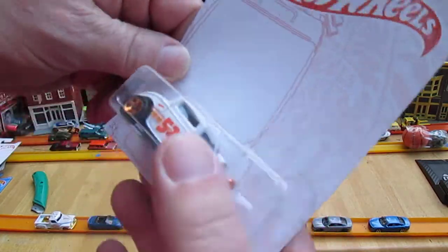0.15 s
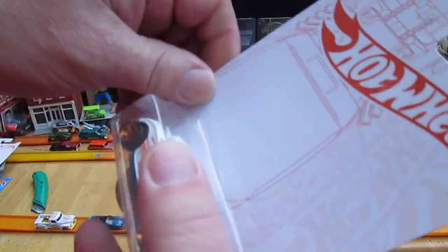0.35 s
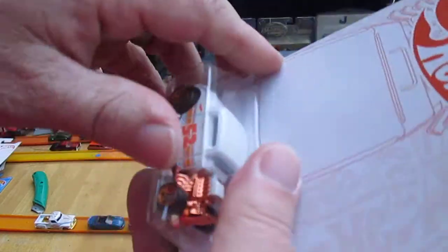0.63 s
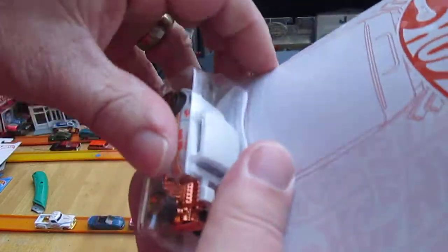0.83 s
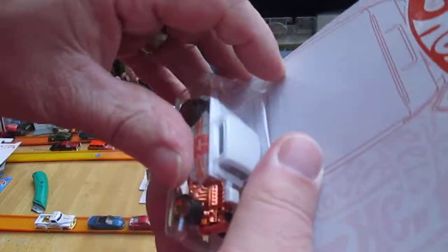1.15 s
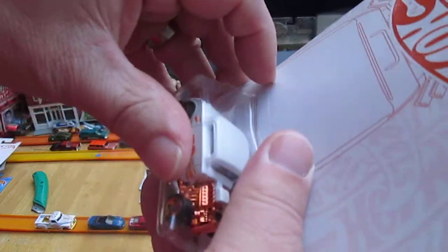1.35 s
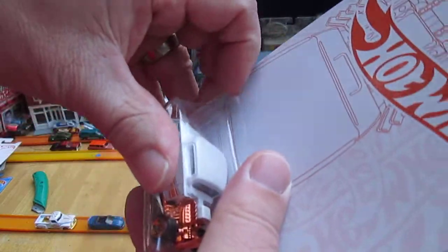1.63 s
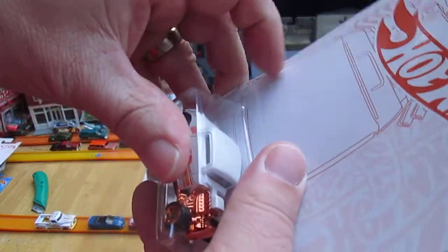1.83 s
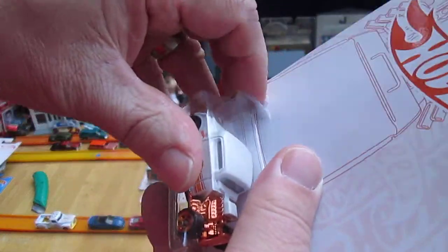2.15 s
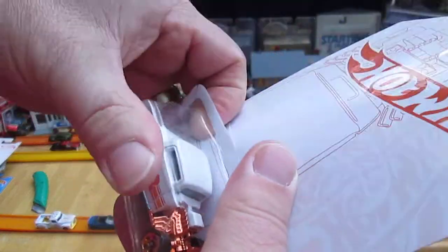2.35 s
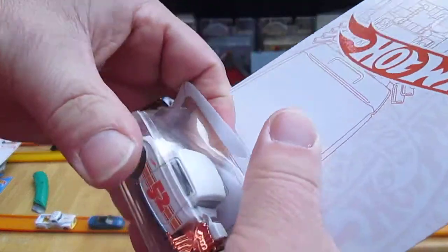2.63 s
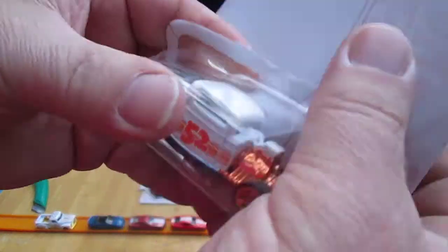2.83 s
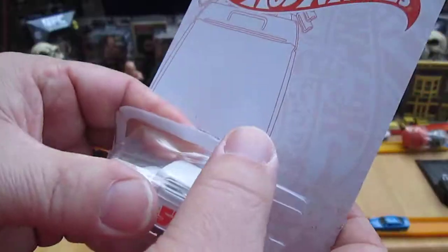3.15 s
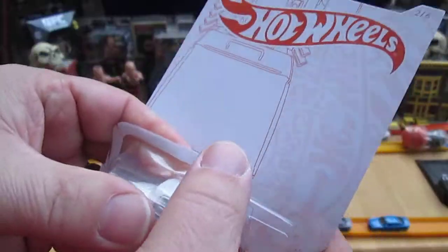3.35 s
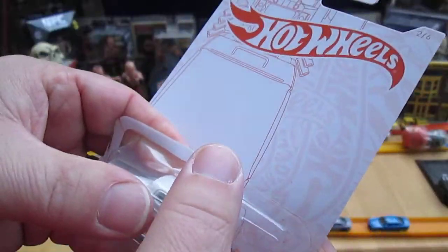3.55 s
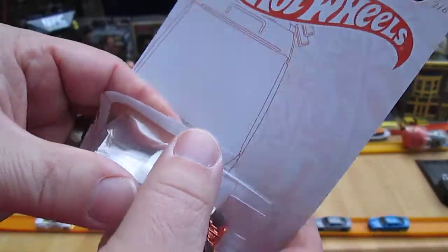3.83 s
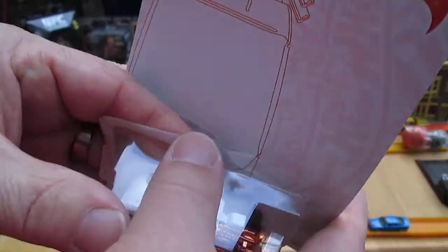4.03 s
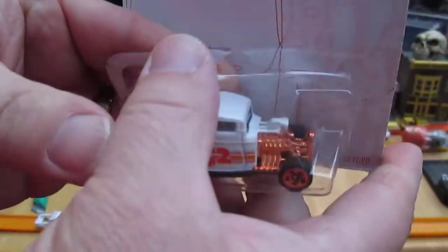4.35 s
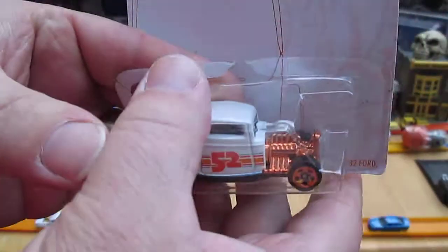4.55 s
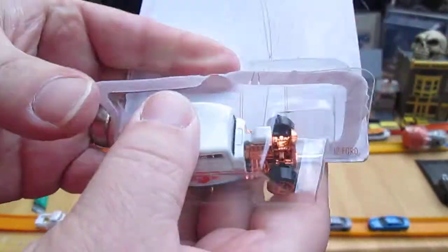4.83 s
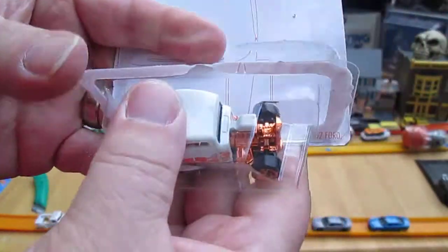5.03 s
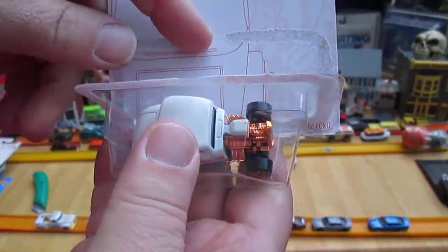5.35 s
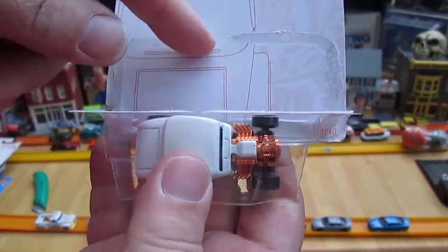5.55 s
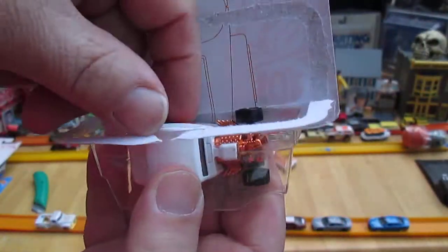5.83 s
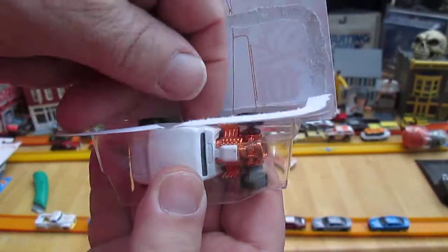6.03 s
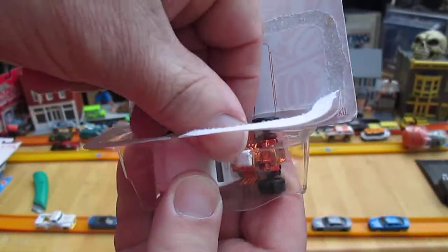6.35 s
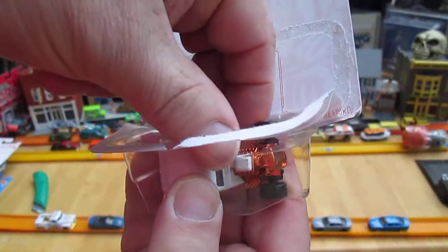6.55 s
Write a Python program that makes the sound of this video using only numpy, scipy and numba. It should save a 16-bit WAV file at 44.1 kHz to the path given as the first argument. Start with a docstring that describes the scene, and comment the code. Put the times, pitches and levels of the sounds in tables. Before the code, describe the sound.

Very close to the microphone in a small quiet room, fingers rub a stiff plastic pack on card. Light crackles lead to a violent snap before two seconds, then more sharp pops, scrapes and glue ticks. A far engine hums low and rises in pitch midway, while a faint bird repeats its phrase. Weaker crackles finish.

```python
"""Hands rub a stiff plastic blister pack, close to a camera in a small quiet room with an engine humming far off.
From half a second on the shell buckles: ringing panels and a noise crack, hardest near 1.7 s, where a limiter
pulls the gain down for seconds. Fingers and card scrape as random slips, and glue fibres tick as noise bursts.
High, brief modes ring with the buckles at 2.3 and 3.9 s; from 3 s the engine turns faster and a far bird repeats
a phrase of gliding sines. Weaker buckles, rubbing and two brief rings at 6.6 s close the scene."""
import sys
import numpy as np
from scipy import signal
from scipy.fft import rfft, irfft, next_fast_len
from scipy.io import wavfile
from scipy.ndimage import uniform_filter1d
from numba import njit

SR = 44100
rng = np.random.default_rng(int(sys.argv[2]) if len(sys.argv) > 2 else 0)


def output_pcm(signal):
    """Save a mono or channel-first signal as 16-bit PCM at the path in sys.argv[1].

    Samples are clipped to [-1, 1] before scaling.
    """
    pcm = np.clip(np.atleast_2d(signal).T, -1, 1) * 32767
    wavfile.write(sys.argv[1], SR, np.round(pcm).astype(np.int16))


N = 295249
TIME = np.arange(N) / SR


def undb(db):
    """Decibels to gain."""
    return 10 ** (np.asarray(db) / 20)


def unit(x):
    """Scale to rms 1."""
    return x / np.sqrt(np.mean(x ** 2) + 1e-18)


def curves(table):
    """The columns of a table, joined by straight lines in time."""
    s, *columns = np.transpose(table)
    return [np.interp(TIME, s, c) for c in columns]


def add(out, s, x):
    """Mix x into out from s seconds on."""
    i = max(int(s * SR), 0)
    out[i:i + len(x)] += x[:max(N - i, 0)]


def fade(t, t60):
    """Exponential decay, 60 dB down at t60."""
    return np.exp(-np.log(1000) * t / t60)


def ring(t, hz, t60):
    """One struck mode: a decaying sine."""
    return np.sin(2 * np.pi * hz * t) * fade(t, t60)


def rings(table):
    """Blows that each ring one short mode."""
    out = np.zeros(N)
    for s, db, hz, t60 in table:
        add(out, s, undb(db) * ring(TIME[:8192], hz, t60))
    return out


def colour(x, points):
    """Filter by a spectrum of (Hz, dB) points, joined on a log frequency axis."""
    hz, db = np.transpose(points)
    size = next_fast_len(len(x))
    f = np.maximum(np.fft.rfftfreq(size, 1 / SR), 1)
    gain = undb(np.interp(np.log(f), np.log(hz), db))
    return irfft(rfft(x, size) * gain, size)[:len(x)]


def resonate(x, hz, q):
    """A resonance with gain 1 at its centre."""
    b, a = signal.iirpeak(min(hz, SR / 4), max(q, .5), fs=SR)
    return signal.lfilter(b, a, x)


def walk(rate):
    """Random levels held 1 / rate seconds and smoothed twice; rms 1."""
    k = int(SR / rate)
    steps = np.repeat(rng.standard_normal(N // k + 1), k)
    return unit(uniform_filter1d(uniform_filter1d(steps, k), k)[:N])


def slips(size, rate, spread_db):
    """Stick-slip: tiny releases at random moments, rate per second, a few much larger than the rest."""
    happens = rng.random(size) < rate / SR
    strength = undb(spread_db * np.minimum(rng.exponential(size=size), 4))
    return happens * strength * rng.choice([-1, 1], size)


def echoes(x, t60, top_hz):
    """Diffuse reflections: band-limited decaying noise, scaled to unit energy."""
    t = TIME[:SR]
    band = signal.butter(2, [120, min(top_hz, SR / 3)], "band", fs=SR, output="sos")
    tail = signal.sosfilt(band, rng.standard_normal(SR))
    tail *= fade(t, t60) * np.minimum(t / 0.0075, 1)  # reflections build up over 7.5 ms
    return signal.fftconvolve(x, tail / np.linalg.norm(tail))[:N]


# the shell buckles: t/s, level/dB, wide panel f/Hz, narrow panel f/Hz, panel t60/s,
# narrow panel level/dB, crack level/dB
SNAPS = [(0.5509, -22.5, 770, 1590, 0.032, -0.5, -3.5), (1.4059, -7, 860, 1360, 0.0069, -10, -18),
         (1.6612, -4, 1020, 1510, 0.0084, -8.5, -4), (1.6655, -2.5, 910, 1480, 0.018, 5.5, -10),
         (1.6705, 12, 1060, 1535, 0.011, 4.5, 3), (1.6724, 13.5, 796, 2260, 0.014, -10.5, 0),
         (1.7151, -19, 930, 1560, 0.0048, 2, 5), (1.815, -11, 844, 1720, .008, -8, -3.5),
         (2.3079, 10, 910, 1770, 0.0095, -3, -10.5), (2.441, -11.5, 770, 1370, .0092, -3, -12),
         (2.4847, 3, 1000, 1370, 0.0038, 2, -2), (2.4869, 7, 804, 1780, 0.0048, 4.5, -8.5),
         (2.4876, 5, 825, 1360, 0.019, 2, -24), (2.495, -2.5, 900, 1240, 0.022, -9, -35),
         (2.6235, -14, 974, 1350, 0.02, -23, -28), (3.9323, 8, 765, 1593, 0.0051, 10.5, -11),
         (4.392, -23.5, 690, 1510, .008, -20, -25), (4.6211, -9, 810, 1440, 0.017, -9, -21),
         (4.788, -0.5, 558.5, 1570, .0085, 2, -12), (4.7898, -3.5, 420, 1027, 0.029, 4, -13),
         (4.796, -6, 910, 2130, .027, -19, 0), (4.8, 3.5, 630, 1490, .0038, -1, -7),
         (4.8058, -6.5, 601, 1340, .0049, 0, -28), (5.3313, -24.5, 925, 1610, 0.015, 13, -2),
         (5.4454, -27, 800, 1510, 0.0093, 0, 4), (5.602, -15, 760, 1240, 0.011, -11, -28),
         (5.7234, -17.5, 680, 1600, 0.018, -0.5, -8), (5.948, -16, 670, 1464, 0.033, 6.5, -5.5),
         (6.1132, -14.5, 1150, 1290, 0.0036, 8, -4.5), (6.238, -21.5, 710, 1570, 0.016, -2, -7.5),
         (6.2939, -19, 890, 1360, 0.0044, 5, -22), (6.303, -20, 850, 1520, 0.0045, -7.5, -9.5),
         (6.4911, -4, 950, 1370, 0.0034, 3.5, -19)]
# modes of the whole shell: f/Hz, level/dB, t60/s
SHELL_MODES = [(165, -15.5, 0.066), (490.6, 6, 0.039), (781, 5, 0.035), (1005, -3.5, 0.058),
               (1270, 4, 0.023), (1610, -9, 0.044), (2740, -15, .018), (3570, -3, 0.012),
               (4900, -20.5, .02), (6850, -21.5, .015)]
# spectrum of the cracking fold: f/Hz, level/dB
CRACK_COLOUR = [(300, -15.5), (1500, -11), (3000, 12), (4000, 3.5), (5500, -3.5), (7500, -6), (11000, -22),
                (15000, -36)]


def snaps(narrow_share=0.83, crack_s=0.00084, push_s=0.00061, after_s=0.0023,
          shell_db=-8, after_db=-9, strain_db=-13, low_cut_hz=200, reach=.15):
    """A crease flips: two panels swing for a few cycles, the fold cracks, the whole shell rings on."""
    out, t = np.zeros(N), TIME[:4096]
    push = 1 - np.exp(-t / push_s)
    for s, db, wide_hz, narrow_hz, panel_t60, narrow_db, sharp_db in SNAPS + crinkles():
        wide = unit(push * ring(t, wide_hz, panel_t60))
        narrow = unit(push * ring(t, narrow_hz, narrow_share * panel_t60))
        panels = wide - undb(narrow_db) * narrow  # the two swing against each other
        burst = np.exp(-(t / crack_s - 1) ** 2 / 2)  # loudest crack_s after the flip starts
        crack = unit(colour(rng.standard_normal(len(t)), CRACK_COLOUR) * burst)
        shell = struck_shell(t)
        # the fold settles in a rough little shudder
        shudder = unit(colour(rng.standard_normal(len(t)), RUB_COLOUR) * push * np.exp(-t / after_s))
        # a weak buckle reaches less of the shell
        shell_gain = undb(shell_db + reach * min(db, 0))
        snap = panels + undb(sharp_db) * crack + shell_gain * shell + undb(after_db) * shudder
        add(out, s, undb(db) * snap / np.abs(snap).max())
        # a sharper crack has more strain before it, up to a limit
        lead = strain()
        add(out, s - len(lead) / SR, undb(db + min(sharp_db, -6) + strain_db) * lead)
    # panels this small radiate little bass
    return signal.sosfilt(signal.butter(2, low_cut_hz, "high", fs=SR, output="sos"), out)


def struck_shell(t):
    """Each crease lies at another spot and reaches the shell's modes in other shares."""
    shell = 0
    for hz, mode_db, t60 in SHELL_MODES:
        gain = rng.choice([-1, 1]) * undb(mode_db + 2 * rng.standard_normal())
        shell = shell + gain * ring(t, hz * (1 + 0.0094 * rng.standard_normal()), t60)
    return unit(shell)


def strain(lead_s=0.0011, rate=4000):
    """Tiny random cracks swell steeply towards the moment a crease gives way."""
    t = TIME[:1024]
    run = colour(slips(len(t), rate, spread_db=6), CRACK_COLOUR) * np.exp((t - t[-1]) / lead_s)
    return run / (np.abs(run).max() + 1e-9)


# runs of small buckles: t/s, length/s, middle level/dB, crack level/dB
CRINKLES = [(1.0, .062, -30, -12), (4.305, .18, -29, -19)]
# a small buckle: middle wide panel f/Hz, middle narrow panel f/Hz, panel t60/s, narrow panel level/dB
SMALL_BUCKLE = (741, 1500, 0.1, -21)


def crinkles(gap_s=0.028, spread_db=3):
    """Small buckles follow each other at uneven gaps, each a little different in strength and pitch."""
    rows = []
    wide_hz, narrow_hz, t60, narrow_db = SMALL_BUCKLE
    for start, length, db, crack_db in CRINKLES:
        for k, (late, louder, higher) in enumerate(rng.standard_normal((12, 3))):
            delay = gap_s * (k + 0.46 * abs(late))
            pitch = np.exp(0.062 * higher)
            if delay < length:
                rows.append((start + delay, db + spread_db * louder, wide_hz * pitch,
                             narrow_hz * pitch, t60, narrow_db, crack_db))
    return rows


# the card flexes: t/s, level/dB, f/Hz, t60/s
FLEXES = [(1.405, -20.5, 230, 0.023), (1.671, -9.5, 386, 0.062), (2.307, -9.5, 420, 0.02),
          (2.487, -4.5, 493, 0.042), (3.932, -11.5, 380, 0.015), (4.787, -7.5, 163, 0.088),
          (4.794, -22, 386, 0.018), (4.825, -14, 196, 0.055), (5.445, -26.5, 260, 0.049),
          (5.6, -27.5, 240, 0.065), (5.632, -20, 482, 0.041)]


def card_flexes():
    """The card flexes as the seam lets go: a short low mode each time."""
    return rings(FLEXES)


# high, brief ringing modes: t/s, level/dB, f/Hz, t60/s
HIGH_RINGS = [(2.308, -1, 5360, 0.007), (3.9322, -14, 5000, 0.0061), (6.6135, -31.5, 3700, 0.015),
              (6.623, -38.5, 3630, 0.029)]


def high_rings():
    """High, brief modes: two near 5 kHz with the buckles at 2.3 and 3.9 s, two near 3.6 kHz at 6.6 s."""
    return rings(HIGH_RINGS)


# short slides and tears: t/s, length/s, level/dB, centre f/Hz, hiss level/dB
SCRAPES = [(0.147, 0.021, -31.5, 1600, -16), (0.286, 0.033, -43, 560, -18), (0.488, 0.028, -35, 915, -14.5),
           (1.65, 0.011, -30.5, 1040, -0.5), (2.777, 0.046, -33, 1014, -4.5),
           (2.828, 0.039, -25.5, 970, -16), (3.889, 0.023, -30, 996, -16), (4.223, 0.036, -34, 1050, -8.5),
           (4.78, 0.023, -18.5, 730, -5), (5.432, 0.029, -37, 1020, -12), (5.593, 0.0229, -28, 596, -19.5),
           (5.623, .035, -33.5, 640, -33), (5.719, 0.017, -35, 970, -15.5), (5.848, 0.047, -32, 1130, -15),
           (5.924, 0.026, -29.5, 1470, -18.5), (6.439, 0.034, -42, 1410, -28),
           (6.483, 0.026, -33.5, 1250, -14)]
# spectrum of the rubbed body: f/Hz, level/dB
RUB_COLOUR = [(100, -17), (280, 4), (500, -1), (800, 3.5), (1200, 0), (1650, -1.5), (2200, -5),
              (3200, -13.5), (4500, -16.5), (9000, -32)]
# spectrum of the hiss at the contact: f/Hz, level/dB
HISS_COLOUR = [(1500, -15), (3000, -1.5), (4800, -1), (6800, -5.5), (8200, -9), (11000, -14.5),
               (15000, -35.5)]


def scrapes(rate=1800, spread_db=2.0, q=0.92):
    """An edge drags over card: a run of slips that swells and stops short."""
    out, t = np.zeros(N), TIME[:8192]
    for s, length, db, hz, hiss_db in SCRAPES:
        force = np.interp(t / length, [0, .5, .9, 1.05], [0.64, 1.0, 0.91, 0.22], right=0)
        drag = unit(slips(len(t), rate, spread_db))
        body = unit(force * resonate(colour(drag, RUB_COLOUR), hz, q))
        hiss = unit(force * colour(drag + rng.standard_normal(len(t)), HISS_COLOUR))
        # rms was taken over the whole buffer: scale it to the scrape's length
        gain = undb(db) * np.sqrt(length / t[-1])
        add(out, s, gain * (body + undb(hiss_db) * hiss))
    return out


def rubbing(rate=2200, spread_db=3.0, uneven_db=1.5, crackle_rate=32, crackle_db=-9,
            modes_db=-4, q=5, wander_db=6, mode_contrast=0.34):
    """Skin and card slide on the shell: fine slips and sparse crackles sound its body and hiss at the contact."""
    body_gain, hiss_gain = sliding()
    grain = unit(slips(N, rate, spread_db)) + rng.standard_normal(N)
    contact = unit(grain) * undb(uneven_db * walk(45))
    contact = contact + undb(crackle_db) * unit(slips(N, crackle_rate, spread_db=4.5))
    # the contact wanders, so the shell's modes come and go
    modes = 0
    for hz, db, _ in SHELL_MODES:
        modes = modes + undb(mode_contrast * db + wander_db * walk(16)) * resonate(contact, hz, q)
    direct = unit(colour(unit(contact), RUB_COLOUR))
    body = unit(direct + undb(modes_db) * unit(colour(modes, RUB_COLOUR)))
    hiss = shifting(colour(contact, HISS_COLOUR))
    return body_gain * body + hiss_gain * hiss


# a finger or the card slides over the shell: t/s (fastest), swell time/s, body level/dB, hiss level/dB
STROKES = [(.01, 0.054, -43, -48), (.16, 0.066, -45.5, -49.5), (.25, 0.05, -39.5, -49.5),
           (0.342, .025, -42, -49.5), (.53, 0.13, -45, -55.5), (.855, 0.091, -45.5, -55),
           (1.029, 0.031, -36.5, -71), (1.29, 0.023, -63.5, -57), (2.131, 0.06, -36, -56),
           (2.23, 0.14, -38, -49), (2.306, 0.042, -30.5, -36), (2.485, 0.067, -34.5, -45),
           (2.636, 0.038, -35.5, -45.5), (2.82, 0.1, -35, -47.5), (3.05, .03, -43, -75),
           (3.77, .06, -51, -58), (3.909, 0.11, -38.5, -48.5), (4.125, 0.059, -38, -47.5),
           (4.4, 0.14, -44, -53.5), (4.689, 0.095, -38, -56), (4.808, .055, -31.5, -39.5),
           (5.211, 0.091, -47, -53), (5.33, 0.14, -46, -56.5), (5.7, 0.1, -44.5, -55),
           (5.93, .09, -43.5, -55.5), (6.25, 0.19, -48.5, -64.5), (6.5, 0.087, -47, -50),
           (6.69, 0.019, -41, -53.5)]


def sliding(grip_body_db=-51.5, grip_hiss_db=-72, release=0.89, shape=1.4):
    """Gains of body and hiss: each stroke speeds up and stops a little faster, over the steady creep of the grip.

    release: fall time over swell time; shape: roundness of the top."""
    body_power, hiss_power = undb(grip_body_db) ** 2, undb(grip_hiss_db) ** 2
    for s, swell_s, body_db, hiss_db in STROKES:
        away = np.maximum(s - TIME, (TIME - s) / release) / swell_s
        speed = np.exp(-np.minimum(away, 10) ** shape)
        body_power = body_power + (undb(body_db) * speed) ** 2
        hiss_power = hiss_power + (undb(hiss_db) * speed) ** 2
    return np.sqrt(body_power), np.sqrt(hiss_power)


def shifting(x, depth_db=1.5, rate=11):
    """Moving fingers cover and uncover the contact: each part of the treble swells and fades on its own."""
    out = 0
    for hz in np.geomspace(2000, 14000, num=9):
        band = [(hz / np.sqrt(2), -25), (hz, 0), (hz * np.sqrt(2), -25)]
        out = out + undb(depth_db * walk(rate)) * colour(x, band)
    return unit(out)


# glue fibres part: t/s, level/dB
TICKS = [(1.6443, -26), (2.1055, -28), (2.1155, -21), (2.124, -25), (2.159, -23.5), (2.286, -18),
         (2.619, -23.5), (4.0893, -13), (4.1127, -18)]
# spectrum of a tick: f/Hz, level/dB
TICK_COLOUR = [(500, -20), (1500, 5.5), (3500, 3), (6000, 5), (9500, 4), (12000, -14), (15000, -11.5)]


def ticks(t60=0.0046):
    """Single glue fibres break with a thin, bright tick of decaying noise."""
    out, t = np.zeros(N), TIME[:1024]
    for s, db in TICKS:
        tick = colour(rng.standard_normal(len(t)), TICK_COLOUR) * fade(t, t60)
        add(out, s, undb(db) * tick / np.abs(tick).max())
    return out


# the bird's phrases: t/s, level/dB
PHRASES = [(3.0, -52), (3.285, -51), (3.565, -50.5), (3.85, -55), (4.16, -51.5), (4.43, -54), (4.75, -57)]
# notes of one phrase: delay t/s, length/s, middle start f/Hz, middle end f/Hz, level/dB
NOTES = [(0, 0.036, 2432, 2296, 4.5), (0.085, 0.093, 2700, 3540, 3.5), (0.207, .05, 4100, 4650, -1.5),
         (.272, 0.036, 5950, 5505, -9)]


def bird(direct_db=-4, far_db=-4.0):
    """A far bird repeats a low note, an upward slur and two thin high notes, smeared by echoes."""
    out = np.zeros(N)
    for s, db in PHRASES:
        for delay, length, start_hz, end_hz, note_db in NOTES:
            u = np.linspace(0, 1, int(length * SR))
            glide_hz = start_hz + (end_hz - start_hz) * np.sin(u * np.pi / 2)
            hz = glide_hz * (1 + .006 * rng.standard_normal())
            note = np.sin(np.pi * u) * np.sin(2 * np.pi * np.cumsum(hz) / SR)
            add(out, s + delay, undb(db + note_db) * note)
    return undb(direct_db) * out + undb(far_db) * echoes(out, t60=1.0, top_hz=7100)


# a far engine heard through the walls: t/s, turn rate f/Hz, level/dB
ENGINE = [(0, 28.37, -48.5), (.7, 29.19, -41), (1.5, 29.13, -48), (2.6, 27.56, -48), (3.1, 29.35, -49.5),
          (3.4, 31.6, -44), (3.7, 33.05, -38), (4.5, 32.92, -42.5), (5.2, 33.14, -39), (5.7, 33.43, -42),
          (6.69, 33.9, -45.5)]
# its orders: multiple of the turn rate, level/dB
ENGINE_ORDERS = [(2, -13), (3, -10), (4, -2), (5, -11), (6, -15), (7, -10)]


def engine(waver=0.0018, fading_db=0.9):
    """Only the low orders of the engine pass the walls; each swells and fades slowly."""
    hz, db = curves(ENGINE)
    turns = np.cumsum(hz * (1 + waver * walk(9.1))) / SR
    hum = 0
    for order, order_db in ENGINE_ORDERS:
        gain = undb(order_db + fading_db * walk(0.74)) * np.sqrt(2)
        hum = hum + gain * np.sin(2 * np.pi * (round(order) * turns + rng.random()))
    return undb(db) * hum


# spectrum of the room's air: f/Hz, level/dB
AIR_COLOUR = [(20, -6.5), (60, 5.5), (110, 1.5), (190, -3), (300, -10), (750, -13.5), (1300, -20),
              (2200, -26), (3300, -29), (5000, -40), (7000, -38.5), (10000, -46), (15000, -58)]


def room_tone(level_db=-42.5):
    """Soft moving air, mostly rumble: coloured noise."""
    return undb(level_db) * unit(colour(rng.standard_normal(N), AIR_COLOUR))


def scene(early_t60_s=0.025, early_db=-23.5, room_t60_s=0.21, room_db=-37):
    """The pack close up, with short reflections off hands and desk and longer ones off the room."""
    pack = snaps() + card_flexes() + high_rings() + scrapes() + rubbing() + ticks()
    near = undb(early_db) * echoes(pack, early_t60_s, top_hz=4730)
    room = undb(room_db) * echoes(pack, room_t60_s, top_hz=3500)
    return (pack + near + room + room_tone() + engine() + bird())[None]


@njit
def limiter(x, ceiling, attack, recover):
    """The gain drops quickly when a peak passes the ceiling and creeps back to 1."""
    y, gain = np.empty(len(x)), 1.
    for i in range(len(x)):
        y[i] = gain * x[i]
        if abs(y[i]) > ceiling:
            gain *= (ceiling / abs(y[i])) ** attack
        else:
            gain = min(gain * recover, 1.)
    return y


def record(dry, ceiling=0.98, attack=0.096, recover_db_per_s=3.5, notch_hz=3950, notch_q=20, top_hz=15700):
    """The camera has two narrow notches an octave apart, a limiter that recovers slowly, and a cut top."""
    x = dry[0]
    for k in (1, 2):
        b, a = signal.iirnotch(k * notch_hz, k * notch_q, fs=SR)
        x = signal.lfilter(b, a, x)
    x = limiter(x, float(ceiling), float(min(attack, 1)), float(undb(recover_db_per_s / SR)))
    top_cut = signal.ellip(8, .2, 70, top_hz, fs=SR, output="sos")
    return signal.sosfilt(top_cut, np.clip(x, -1, 1))[None]


dry = scene()
out = record(dry)
output_pcm(out)
```